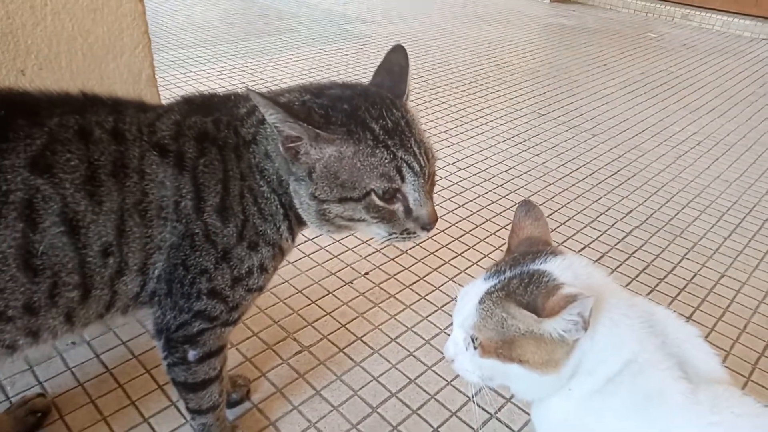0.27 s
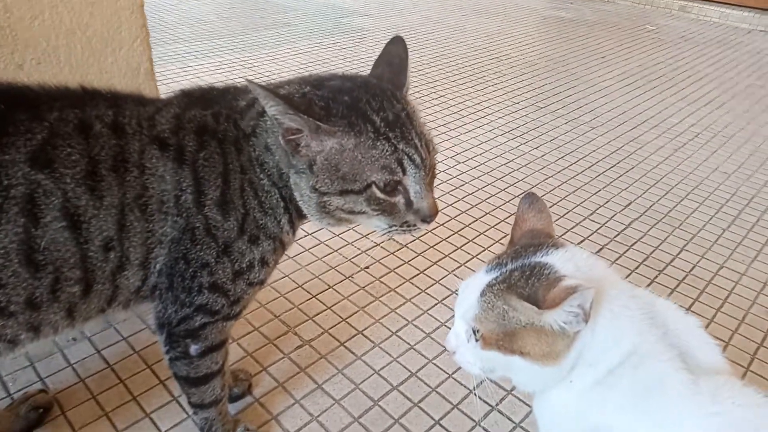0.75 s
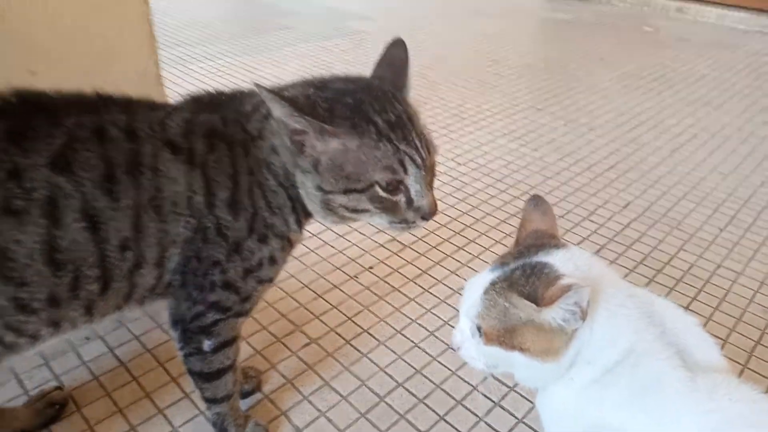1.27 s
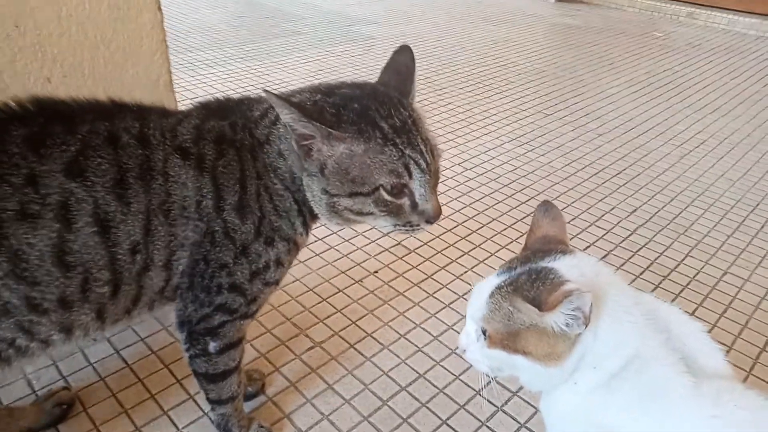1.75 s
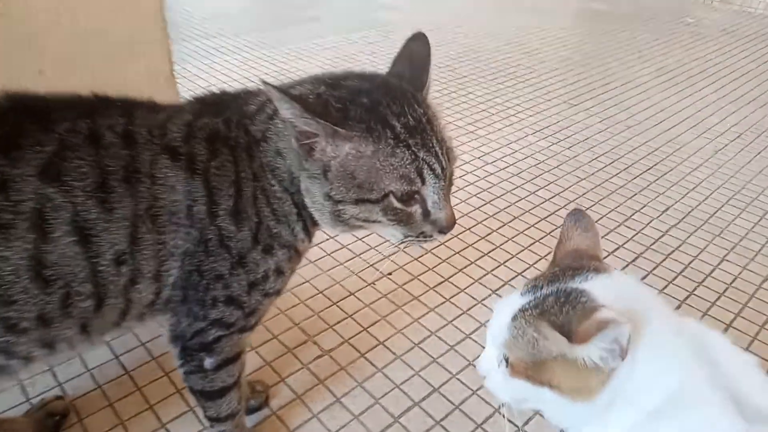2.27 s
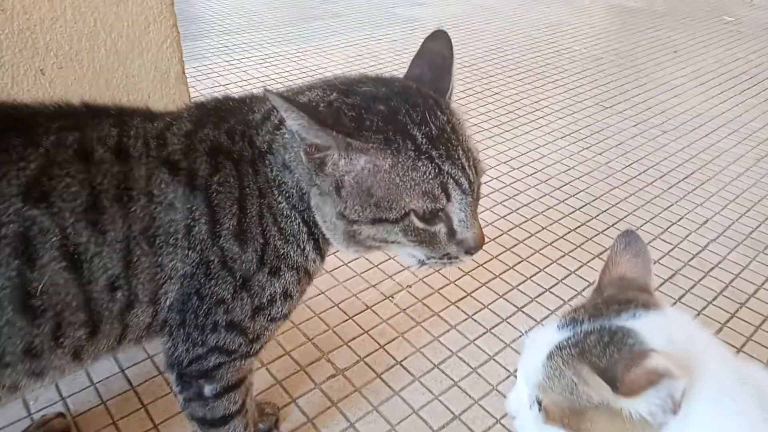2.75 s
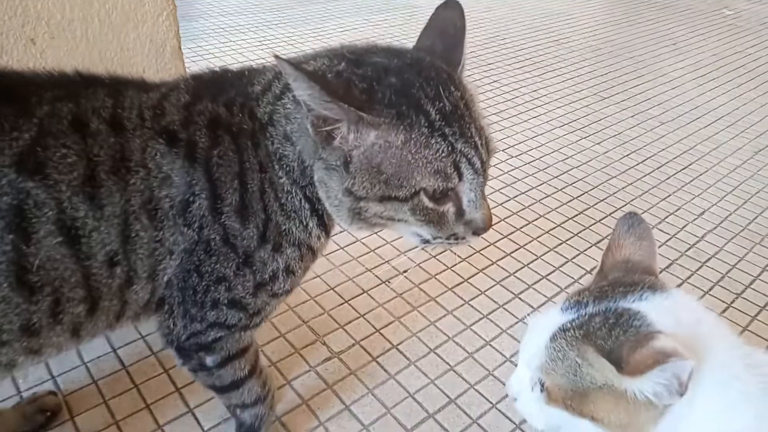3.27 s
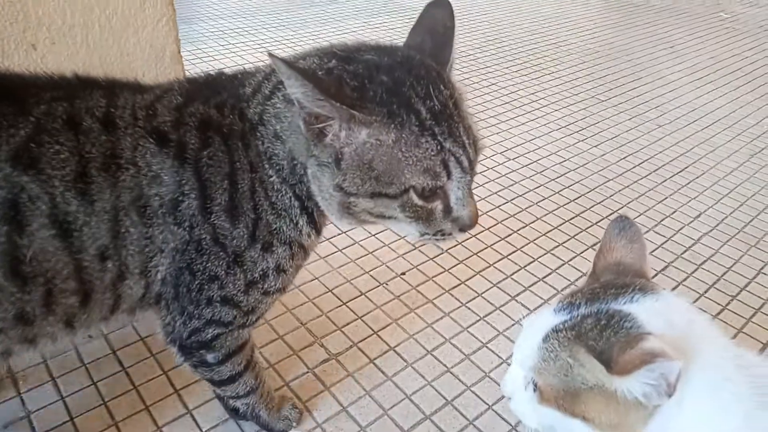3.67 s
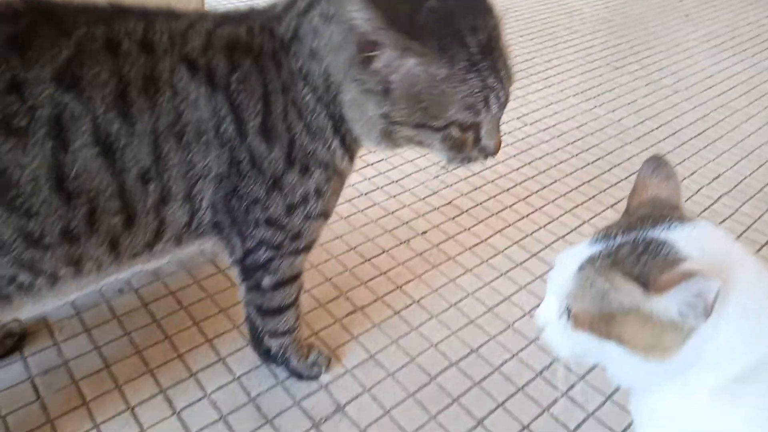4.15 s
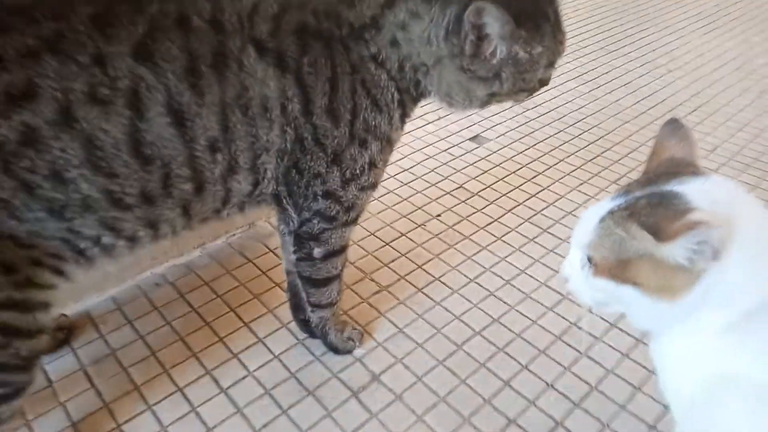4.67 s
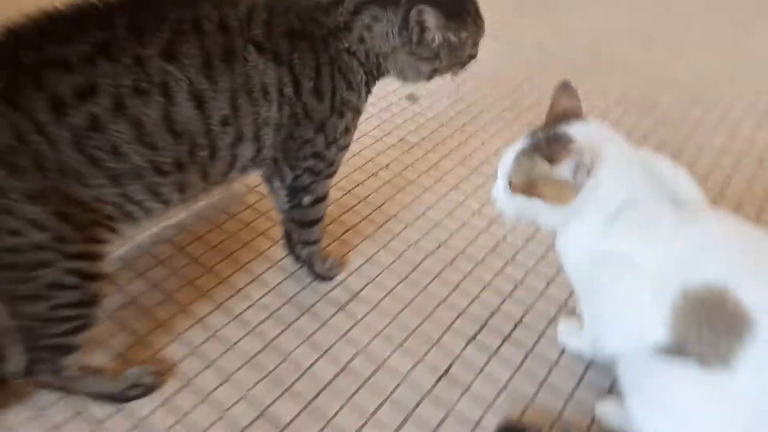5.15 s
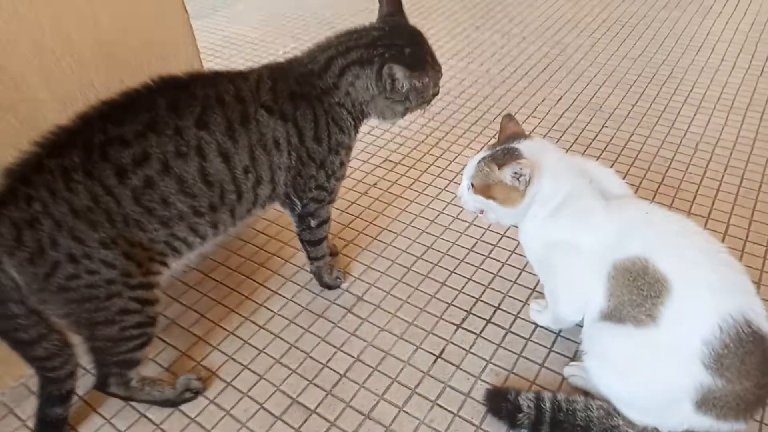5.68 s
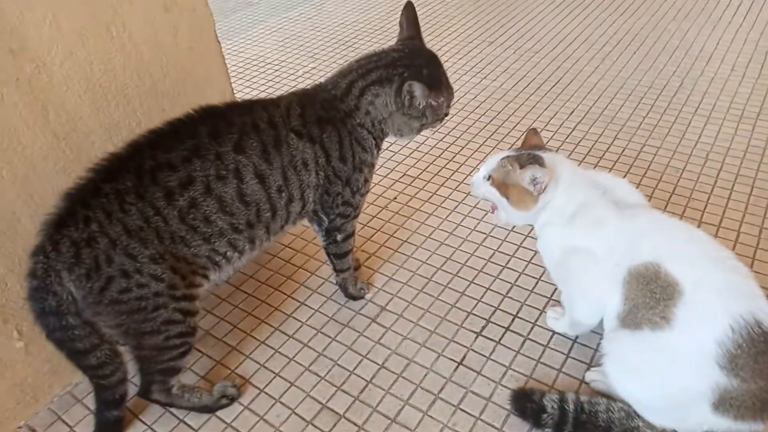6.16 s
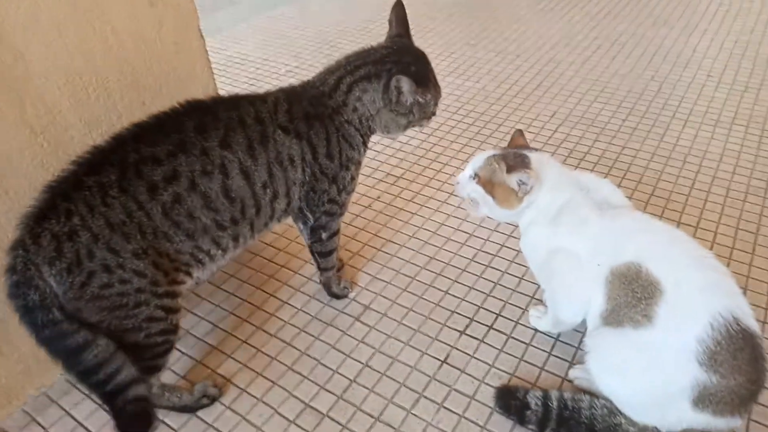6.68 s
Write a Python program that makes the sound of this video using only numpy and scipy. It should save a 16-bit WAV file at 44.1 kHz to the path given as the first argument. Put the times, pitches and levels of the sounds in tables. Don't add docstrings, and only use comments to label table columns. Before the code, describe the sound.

Two cats face off close to a small, treble-dulled microphone in a hard tiled hall. From 0 to 1.6 s the tabby gives a clear, hollow moan, steady at first, then sliding down by over half an octave, with the white cat's low, creaky growl quieter underneath until about 1.25 s. Faint rumble and hiss fill the pause. At 2.1 s the tabby swoops up into a strong, smooth yowl, holding high around 3 s and sagging by 3.55 s; a short weaker tail drops away by 4.05 s. Meanwhile the white cat rises from 2.35 s, peaks roughly at 3.8 s, then falls into a low, wavering, rough moan until 4.85 s. After another gap, its loudest yowl erupts at 5.4 s, harsh, nasal and rasping, sustained high until 6.65 s and dropping by 6.9 s. Short echoes trail the calls.

```python
import sys
import numpy as np
from scipy import signal
from scipy.fft import rfft, irfft, next_fast_len
from scipy.io import wavfile

SR = 44100
rng = np.random.default_rng(int(sys.argv[2]) if len(sys.argv) > 2 else 0)


def persist_wave(psi):
    counts = np.round(np.clip(psi, -1, 1) * 32767).astype(np.int16)
    wavfile.write(sys.argv[1], SR, np.atleast_2d(counts).T)


def gain_from_db(level_db):
    decades = np.asarray(level_db, float) / 20
    return 10 ** decades


N = 305083
TOP_HZ = 15520


def tabby():
    # start_s, pitch_hz, partial_1_db, partial_2_db, partial_3_db, partial_4_db, upper_partials_db
    moan = [(0.0, 452.2, -27.5, -26, -48.5, -30, -49.1), (0.12, 453.4, -32.5, -28, -48, -31.5, -46),
            (0.26, 449.8, -28, -23.5, -47, -25.5, -46.5), (0.33, 453.9, -29.5, -21, -42, -25.5, -40),
            (0.45, 454, -32, -19, -42.5, -25.5, -42), (0.57, 453.9, -31, -19.5, -45, -27, -40.5),
            (0.64, 453.5, -29, -23.5, -49, -28.5, -43), (0.68, 449.5, -30, -27.5, -49, -32, -48),
            (0.74, 434.2, -31, -26, -68, -41, -52), (0.8, 399.4, -31.5, -29, -55, -64, -49),
            (0.86, 378.2, -38, -27.5, -46, -55.8, -51.5), (0.92, 348.6, -28.0, -35.0, -46, -59.3, -52),
            (0.96, 345, -44, -41, -37, -69, -64), (1.0, 337.0, -34.5, -36.5, -51, -62, -61),
            (1.1, 325.5, -27, -46, -40.5, -57, -67), (1.2, 312.6, -43.5, -45, -44, -61.6, -61),
            (1.3, 296.5, -33.5, -39.0, -42.5, -61, -65), (1.42, 293.5, -29, -40.5, -42, -64, -59.5),
            (1.53, 294.4, -32, -33.5, -44, -63.1, -53.5), (1.57, 281.3, -38, -46, -36, -53.2, -62),
            (1.6, 282, -66, -72, -67, -72.0, -72.3)]
    yowl = [(2.1, 233, -74.5, -79, -79.5, -88, -67.8), (2.13, 245.5, -35, -40, -34, -49.1, -59.5),
            (2.2, 308.6, -37.5, -33, -27, -49, -44.5), (2.25, 332, -29, -29, -21, -39, -39),
            (2.3, 371.4, -33, -15.5, -34, -33, -36), (2.35, 409.7, -34, -14, -28.5, -20, -33.2),
            (2.4, 434.6, -30, -8.3, -31.5, -23, -34.5), (2.45, 462.7, -34.5, -9.2, -38, -20, -31),
            (2.5, 486, -39, -13, -56, -24.8, -40.5), (2.55, 484.5, -41, -12, -38, -32, -34.5),
            (2.62, 498.7, -42, -12.5, -35.8, -25, -38.5), (2.68, 526, -31.5, -11, -32.5, -30.5, -31),
            (2.75, 540.4, -40, -16, -21, -21, -34.5), (2.8, 546.8, -33.5, -26.5, -18.5, -25.5, -38),
            (2.85, 549.3, -36.5, -19.5, -14, -25.5, -36), (2.92, 557.6, -35.5, -17.0, -14, -26.5, -39.5),
            (3.0, 558.8, -40, -16.5, -18.5, -23, -39), (3.1, 560, -39, -12.5, -18, -24, -33.5),
            (3.2, 563.0, -38, -11.5, -20, -24, -35), (3.27, 554.7, -40.5, -20.5, -16.5, -27, -37),
            (3.31, 542.2, -35.5, -22, -20, -27.5, -36), (3.35, 536.3, -36, -18.5, -21, -25.5, -38),
            (3.45, 519.6, -41.5, -13.5, -26, -18, -35.5), (3.5, 492.2, -33.5, -13, -26, -23, -39.5),
            (3.54, 474.4, -41.5, -20, -24.5, -39.5, -36.5), (3.57, 472.3, -52, -50, -59.5, -56, -48)]
    tail = [
        (3.64, 498, -41, -46, -33, -51.6, -107.7),
        (3.68, 490.1, -40.3, -43.5, -31, -45, -92),
        (3.74, 449, -32.5, -53, -64, -35, -86),
        (3.8, 413.3, -34.5, -39.5, -44, -47, -89),
        (3.85, 372, -43, -41, -52, -26, -95),
        (3.9, 351.2, -35.5, -48.4, -55, -41.5, -94),
        (3.98, 351.7, -37, -60, -43, -27.5, -99),
        (4.02, 278, -44, -58, -49, -46, -92.7),
        (4.06, 170.3, -71, -50.3, -62.7, -71.0, -106.3),
    ]
    return tabby_call(moan) + tabby_call(yowl) + tabby_call(tail)


def tabby_call(rows):
    # freq_hz, level_db
    throat = [(900, 1.5), (2300, -7.5), (2800, -7.5), (3400, -13), (4000, 0.5), (5000, -11.5), (6000, -17),
              (7500, -6), (9000, -10.5), (15000, -15.5)]
    t = call_times(rows)
    pitch_hz = in_time(rows, t)[0]
    phase = fold_phase(pitch_hz, wobble=0.0014, jitter=0.002)

    pitch_hz, *lowest_db, upper_db = in_time(rows, t[::32])
    voice = 0
    for k, level_db in enumerate(lowest_db):
        voice = voice + partial(phase, k + 1, level_db, pitch_hz)
    for k in range(5, 34):
        level_db = upper_db - 4 + at_hz(throat, k * pitch_hz)
        voice += partial(phase, k, level_db, pitch_hz)

    breath = gain_from_db(-29.5) * drift(170, len(t))
    return placed(voice * (1 + breath), t)


def white_cat():
    # start_s, pitch_hz, partial_1_db, partial_2_db, mouth_db, low_resonance_hz, high_resonance_hz
    growl = [(0.0, 251.0, -46, -44.5, -65.5, 1500, 3000), (0.062, 248, -43.5, -46, -62, 1500, 3000),
             (0.18, 231.6, -47, -31.5, -55.5, 1500, 3000), (0.312, 199, -43.5, -48.5, -56, 1500, 3000),
             (0.43, 157.9, -38.5, -61.5, -62, 1500, 3000), (0.65, 185, -46, -50.5, -60, 1500, 3010),
             (0.752, 150.4, -41.5, -46, -68, 1500, 3030), (0.942, 151.4, -41.5, -64, -61, 1500, 2980),
             (1.03, 140.4, -54, -63, -66.5, 1500, 3000), (1.092, 152.4, -52, -45, -50, 1500, 3000),
             (1.25, 134.8, -38, -53, -62.5, 1500, 3050)]
    rise = [(2.33, 229.7, -67.5, -65, -70, 1290, 2630), (2.4, 254.5, -41.5, -52.5, -43.5, 1330, 2633),
            (2.5, 287.1, -53, -55, -54, 1350, 2667), (2.6, 317.5, -45, -48, -54, 1350, 2700),
            (2.72, 321.9, -38, -61, -40, 1390, 2750), (2.85, 335, -41, -53.5, -46, 1392, 2800),
            (3.0, 373, -48.5, -52, -42.0, 1410, 2833), (3.1, 415.3, -44, -44, -44.5, 1418, 2810),
            (3.2, 430.7, -41.5, -35.5, -35.5, 1454, 2880), (3.3, 467, -47, -42.2, -29.5, 1500, 3000),
            (3.4, 489.1, -44.5, -43, -27, 1550, 3070), (3.48, 487.7, -47, -22, -30, 1593, 3180),
            (3.58, 490, -42.5, -30, -24.5, 1665, 3050), (3.68, 504.8, -44, -33, -29, 1780, 3100),
            (3.78, 511.8, -63, -38, -23, 1870, 3107), (3.85, 485, -38.5, -36.5, -25, 1867, 2850),
            (3.9, 462, -48, -38.5, -25, 1833, 2720), (3.97, 416.3, -43.5, -40, -26, 1760, 2430),
            (4.02, 378.6, -43, -57, -25, 1650, 2300), (4.07, 359, -40, -54, -34, 1520, 2220),
            (4.13, 346.4, -43.5, -74, -43, 1370, 2160), (4.19, 297.3, -39.5, -47, -47, 1202, 2155),
            (4.25, 259, -38.6, -53, -54, 1040, 2110), (4.35, 252.2, -38.5, -56, -59.5, 925, 2125),
            (4.45, 261.3, -43.5, -54, -49, 975, 2175), (4.5, 284.6, -39, -41.5, -40, 1010, 2190),
            (4.55, 272.4, -48, -41, -39, 1000, 2160), (4.6, 277.2, -43, -43.9, -38.5, 1000, 2160),
            (4.68, 277, -46, -35, -42, 990, 2170), (4.73, 260, -40, -54, -43, 924, 2169),
            (4.78, 236.5, -41, -48, -45, 867, 2137), (4.8, 209, -52, -62, -58, 845, 2125),
            (4.84, 194.8, -68.2, -68, -62, 800, 2100)]
    yowl = [(5.38, 187, -73, -59, -34, 2060, 3130), (5.396, 205.2, -48, -61, -51, 2020, 3360),
            (5.448, 291.1, -45, -42.5, -48.5, 1440, 2900), (5.468, 326.2, -51, -44, -31.5, 1505, 2700),
            (5.52, 342.3, -51, -46.5, -28, 1470, 2660), (5.602, 445.6, -45, -41, -21, 1767, 3030),
            (5.644, 474.2, -43, -37, -17.5, 1836, 3350), (5.704, 485.4, -38.5, -32.5, -17, 1990, 3620),
            (5.876, 489.4, -38.5, -35.5, -16.5, 2190, 3750), (5.93, 504.4, -51, -38, -10.5, 1940, 4180),
            (5.952, 508, -43, -32.5, -13, 2240, 3910), (6.094, 522.2, -38.5, -32, -14.5, 2000, 3800),
            (6.324, 514.2, -41, -27.5, -9.5, 2420, 4000), (6.394, 502, -47, -33, -12.5, 2204, 4090),
            (6.508, 485.2, -39.5, -31.5, -15, 2270, 4000), (6.636, 481.3, -38.5, -29.5, -13, 2350, 3500),
            (6.702, 465, -52, -36, -15.5, 2120, 3070), (6.804, 396, -48, -34, -18, 1640, 2800),
            (6.868, 363.5, -47.5, -33.5, -27.5, 1506, 2860), (6.918, 367, -46, -52, -33, 1560, 2900)]
    return white_cat_call(growl) + white_cat_call(rise) + white_cat_call(yowl)


def white_cat_call(rows):
    # start_s, half_lines_db, quarter_lines_db, rasp_db
    uneven = [(0, -0.5, -61.5, -27), (.3, -0.5, -36.5, -21), (.5, -26.5, -37.5, -23.5),
              (3.0, -29, -32.5, -12), (3.4, -34, -34.5, -25), (3.5, -9, -54.5, -32.5),
              (3.85, -10.5, -21.5, -16), (4.1, -2, -24, -10), (4.2, -3.5, -27.5, -25), (4.5, 0, -39, -10.5),
              (4.84, -1, -27.5, -10.5), (5.4, -9, -36, -14.5), (5.6, -18, -22, -5.5), (5.7, -2, -41, -22.5),
              (5.87, -4, -39, -5.5), (5.9, -15.5, -30, -14.5), (5.98, -4.5, -36, -3.5),
              (6.02, 2, -34.5, -31), (6.23, 3.5, -37, -30), (6.27, -7, -5, -18.5), (6.48, -7, -21, -11),
              (6.52, -5.5, -32, -32), (6.6, -5.5, -36.5, -25.5), (6.65, -28.5, -32.5, -13),
              (6.92, -19, -41.5, -5.5)]
    # freq_hz, level_db
    throat = [(600, 5), (1200, -1), (4400, -7), (5300, 0.5), (6500, 5), (8500, -17.5), (15000, -8.5)]
    t = call_times(rows)
    pitch_hz = in_time(rows, t)[0]
    phase = fold_phase(pitch_hz, wobble=0.0015, jitter=0.0038)

    pitch_hz, first_db, second_db, mouth_db, low_hz, high_hz = in_time(rows, t[::32])
    half_db = in_time(uneven, t[::32])[0]
    voice = partial(phase, 0.5, first_db + half_db - 6, pitch_hz)
    voice += partial(phase, 1, first_db, pitch_hz)
    voice += partial(phase, 1.5, (first_db + second_db) / 2 + half_db, pitch_hz)
    voice += partial(phase, 2, second_db, pitch_hz)

    for k in range(5, 64):
        hz = k / 2 * pitch_hz
        low_peak = 1 / (1 + ((hz - low_hz) / 450) ** 2) ** 2
        high_peak = 0.52 / (1 + ((hz - high_hz) / 600) ** 4)
        mouth_shape_db = 10 * np.log10(low_peak + high_peak + 0.0048)
        level_db = mouth_db - 6 + mouth_shape_db + at_hz(throat, hz) + half_db * (k % 2)
        swell_db = 4.14 * drift(250, len(hz))
        voice += partial(phase, k / 2, level_db + swell_db, pitch_hz)

    _, quarter_db, rasp_db = in_time(uneven, t)
    every_fourth = 2 * gain_from_db(quarter_db) * np.cos(phase / 4)
    rasp = gain_from_db(rasp_db) * drift(130, len(t))
    return placed(voice * (1 + every_fourth + rasp), t)


def fold_phase(pitch_hz, wobble, jitter):
    n = len(pitch_hz)
    unsteady = 1 + wobble * drift(18, n) + jitter * drift(150, n)
    return 2 * np.pi * np.cumsum(pitch_hz * unsteady) / SR


def partial(phase, multiple, level_db, pitch_hz):
    gain = np.sqrt(2) * gain_from_db(level_db) * (multiple * pitch_hz < TOP_HZ)
    start_phase = 2 * np.pi * rng.random()
    return np.repeat(gain, 32)[:len(phase)] * np.sin(multiple * phase + start_phase)


def call_times(rows):
    start, stop = round(rows[0][0] * SR), round(rows[-1][0] * SR)
    return np.arange(start, min(stop, N)) / SR


def placed(voice, t):
    before_s = t - t[0] if t[0] > 0 else 1
    after_s = t[-1] - t if t[-1] < (N - 2) / SR else 1
    fade = np.clip(np.minimum(before_s, after_s) / 0.017, 0, 1)
    out = np.zeros(N)
    out[np.round(t * SR).astype(int)] = voice * fade
    return out


def in_time(rows, t):
    s, *columns = np.transpose(rows)
    return [np.interp(t, s, c) for c in columns]


def at_hz(points, hz):
    freq_hz, level_db = np.transpose(points)
    return np.interp(np.log(hz), np.log(freq_hz), level_db)


def drift(rate_hz, size):
    settle = 20000
    r = np.exp(-2 * np.pi * rate_hz / SR)
    noise = rng.standard_normal(size + settle)
    return rms_one(signal.lfilter([1], [1, -2 * r, r * r], noise)[settle:])


def rms_one(x):
    return x / np.sqrt(np.mean(x ** 2) + 1e-20)


def hall(x):
    t60_s, wall_cut_hz = 0.53, 8400
    size = next_fast_len(N + SR)
    turn = np.exp(-2j * np.pi * np.arange(size // 2 + 1) / size)
    dull = np.exp(-2 * np.pi * wall_cut_hz / SR)
    wall = (1 - dull) / (1 - dull * turn)
    lags = (rng.uniform(0.012, 0.05, 10) * SR).astype(int)
    answer = 0
    for k, lag in enumerate(lags):
        loop = gain_from_db(-60 * lag / SR / t60_s) * wall * turn ** lag
        answer = answer + (-1) ** k * loop / (1 - loop)
    return irfft(rfft(x, size) * answer, size)[:N]


def background():
    # start_s, rumble_db, hiss_db
    levels = [(0.0, -49.5, -40.5), (0.27, -49.5, -48), (0.44, -44, -44.5), (0.81, -48, -46),
              (1.31, -45.5, -45.5), (2.19, -48, -46), (2.52, -51.5, -39), (2.85, -50, -44.5),
              (2.99, -46.5, -49.5), (3.39, -52, -39.5), (3.89, -54, -48), (4.72, -46.5, -41.5),
              (5.32, -50, -41.5), (5.68, -49.5, -50), (6.92, -51, -53.5)]
    # freq_hz, level_db (per Hz)
    rumble = [(15, -70), (25, -51), (48, -20.5), (123, 0), (221, -8.5), (271, -6.5), (311, -9), (500, -22),
              (650, -50), (1100, -120)]
    # freq_hz, level_db (per Hz)
    hiss = [(230, -11.5), (320, -1), (900, 1), (1600, 3.5), (2300, -4), (3800, -6), (6000, -7),
            (10000, -3.5), (16500, -8)]
    rumble_db, hiss_db = in_time(levels, np.arange(N) / SR)
    low = gain_from_db(rumble_db + 1.5) * coloured(rumble, patchy_db=1.5)
    return low + gain_from_db(hiss_db) * coloured(hiss, patchy_db=0.4)


def coloured(spectrum, patchy_db):
    white = rng.standard_normal((2, N))
    low_hz, high_hz = spectrum[0][0], spectrum[-1][0]
    edges_hz = low_hz * 2 ** np.arange(0, np.log2(high_hz / low_hz), 1 / 3)
    out = 0
    for k, (low, high) in enumerate(zip(edges_hz, edges_hz[1:])):
        sos = signal.butter(2, [low, high], "band", fs=SR, output="sos")
        band = signal.sosfilt(sos, white[k % 2])
        flicker = np.repeat(drift(400, N // 64 + 1), 64)[:N]
        level_db = at_hz(spectrum, np.sqrt(low * high)) + patchy_db * flicker
        out = out + band * gain_from_db(level_db)
    return rms_one(out)


def scene():
    cats = tabby() + white_cat()
    echo = gain_from_db(-17) * hall(cats)
    return (cats + echo + background())[None]


def roll_off(x):
    return signal.sosfilt(signal.butter(12, 15520, fs=SR, output="sos"), x)


def record(dry):
    # freq_hz, level_db
    microphone = [(40, -4.5), (70, 1), (4000, 1), (4700, -5.5), (5400, -19), (6300, -18), (8000, -25),
                  (9800, -44.5), (12500, -47), (15400, -44.5)]
    size = next_fast_len(N + 4096)
    hz = np.arange(size // 2 + 1) * SR / size + 1
    heard = irfft(rfft(dry, size) * gain_from_db(at_hz(microphone, hz)), size)[:, :N]
    limited = 0.95 * np.tanh(heard / 0.95)
    return roll_off(limited)


dry = scene()
out = record(dry)
persist_wave(out)
```